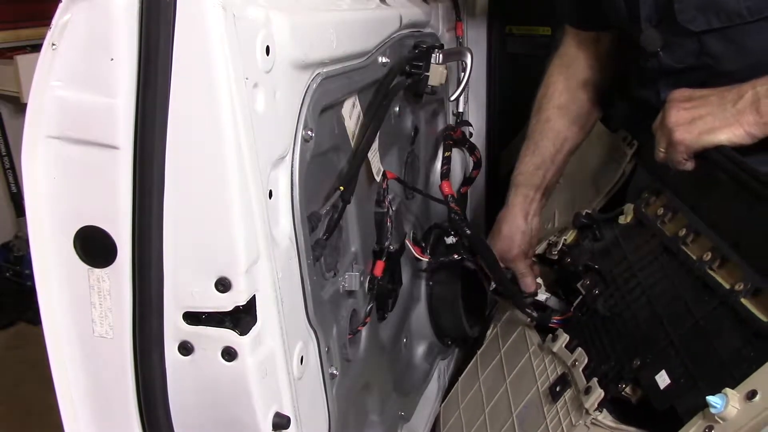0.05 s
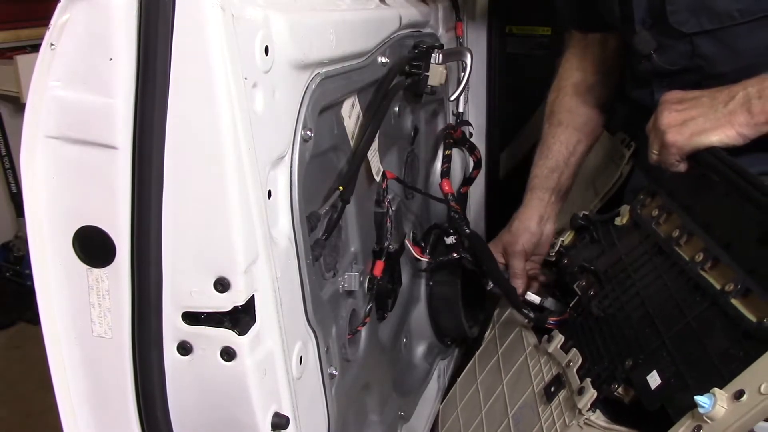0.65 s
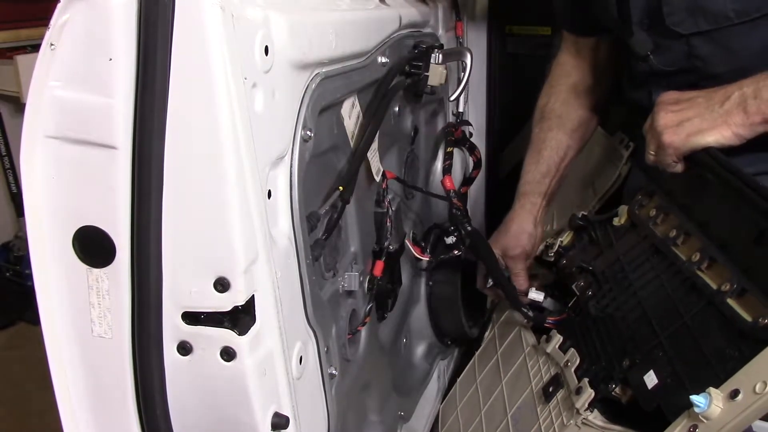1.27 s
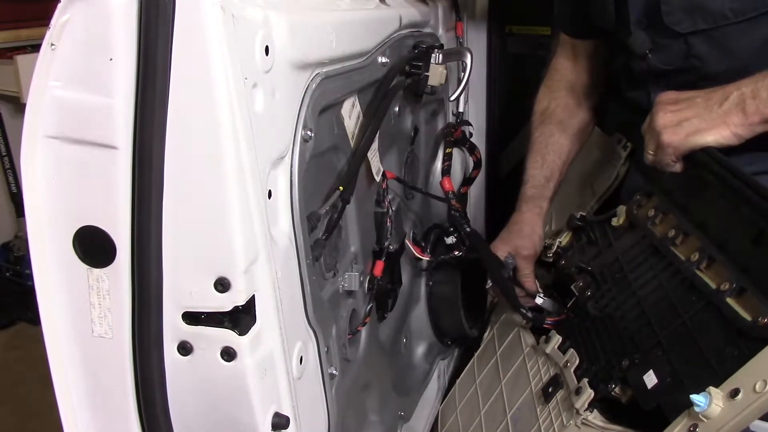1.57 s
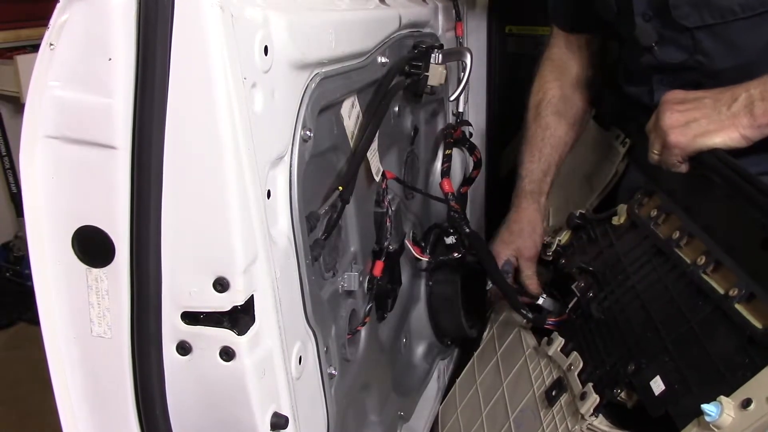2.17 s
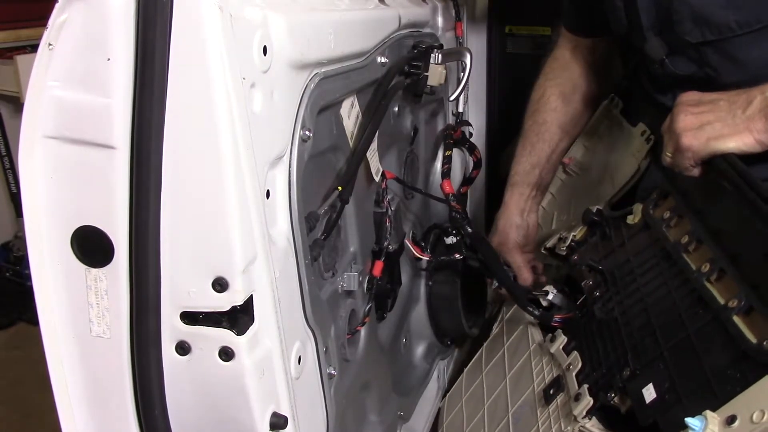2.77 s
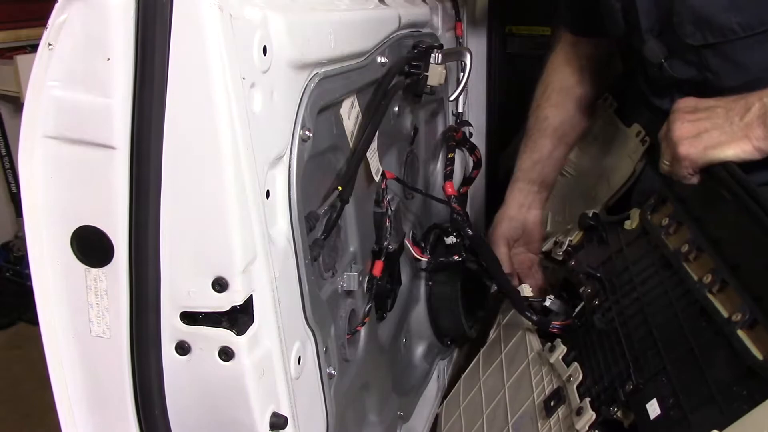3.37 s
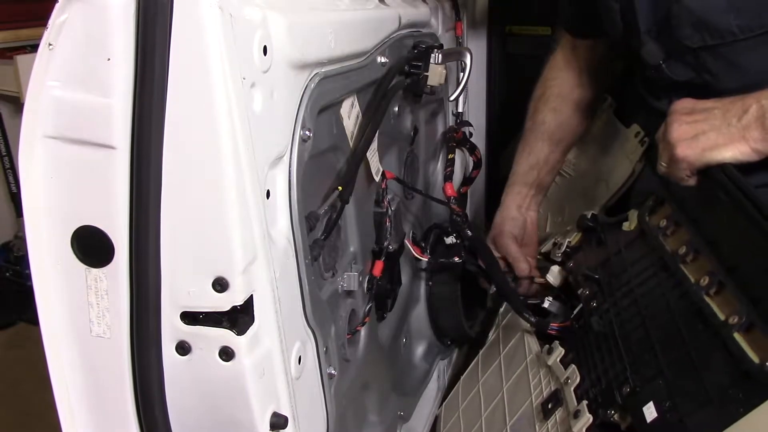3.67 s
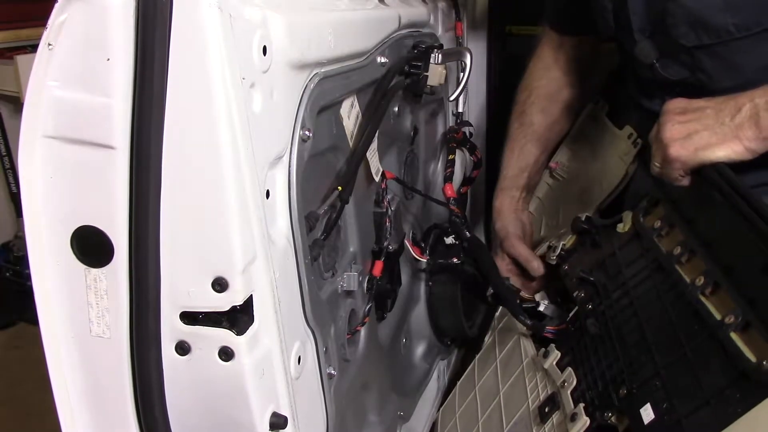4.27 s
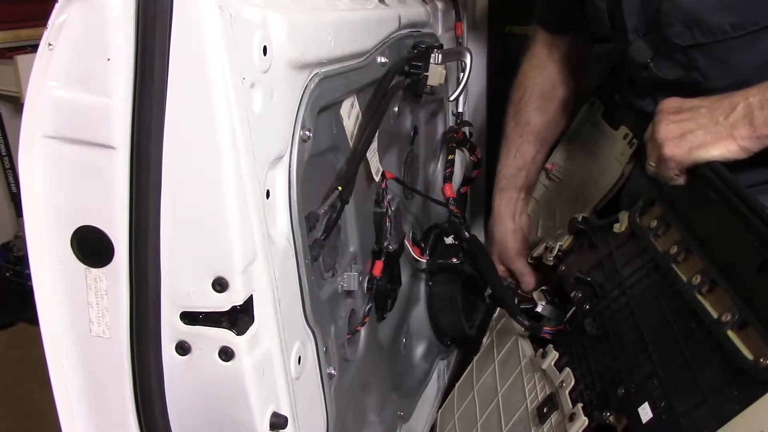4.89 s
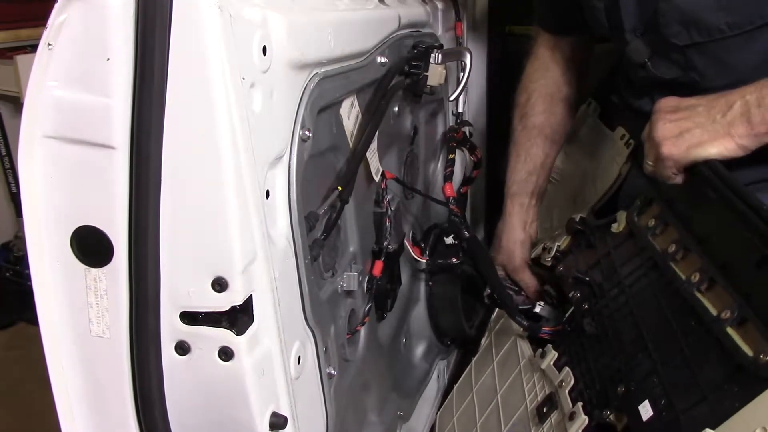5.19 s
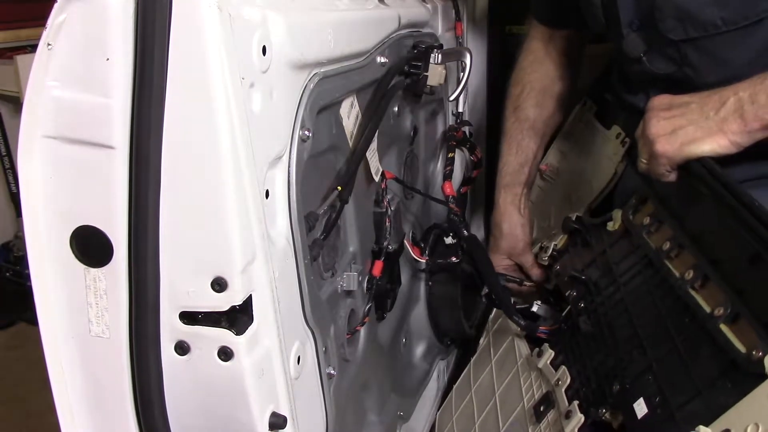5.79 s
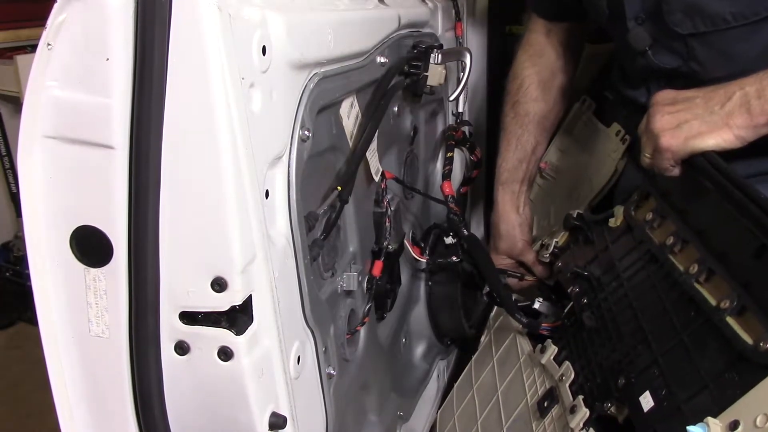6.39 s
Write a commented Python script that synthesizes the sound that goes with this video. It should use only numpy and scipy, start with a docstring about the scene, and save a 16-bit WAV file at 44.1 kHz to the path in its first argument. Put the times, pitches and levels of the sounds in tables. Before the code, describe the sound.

Hands fit plastic plugs into a loose car door panel, making light hollow knocks, small clicks and low thumps in a quiet workshop.

```python
"""In a quiet workshop, hands plug plastic wiring connectors into the back of a loose car door panel.
Plugs and cables brush and knock on the hollow panel, which rings briefly. Each bout of handling
brings dull thumps and a low rumble. One latch snaps home, plastic scuffs and a small catch flicks.
The room adds a short echo, and a close mono microphone adds hiss and a thin electronic whine."""
import sys
import numpy as np
from scipy import signal
from scipy.fft import rfft, irfft, next_fast_len
from scipy.io import wavfile
from scipy.ndimage import uniform_filter1d

SR = 44100
rng = np.random.default_rng(int(sys.argv[2]) if len(sys.argv) > 2 else 0)


def generate_wav(sig):
    """Save sig (samples, or channels by samples) to the path in sys.argv[1] as 16-bit PCM at SR."""
    pcm = np.round(np.clip(np.atleast_2d(sig).T, -1, 1) * 32767).astype(np.int16)
    wavfile.write(sys.argv[1], SR, pcm)


N = 292775
TIME = np.arange(N) / SR


def from_db(db):
    """Turn decibels into a number to multiply a sound by."""
    return 10 ** (np.asarray(db) / 20)


def rms_one(x):
    """Scale a sound so that its average level (rms) is 1."""
    return x / np.sqrt(np.mean(x ** 2) + 1e-20)


def add(track, start_s, sound):
    """Mix a sound into a track at a given time."""
    start = int(round(start_s * SR))
    track[start:start + len(sound)] += sound[:N - start]


def band_noise(low_hz, high_hz, size):
    """Noise between a low and a high pitch, at average level 1."""
    band = signal.butter(2, [low_hz, min(high_hz, SR * .45)], "band", fs=SR, output="sos")
    return rms_one(signal.sosfilt(band, rng.standard_normal(2 * size))[size:])


def coloured_noise(spectrum):
    """Noise whose balance of lows and highs follows a table, at average level 1."""
    hz, db = np.transpose(spectrum)
    size = next_fast_len(N, real=True)
    bins_hz = np.maximum(np.arange(size // 2 + 1) * SR / size, 1)
    gain = from_db(np.interp(np.log(bins_hz), np.log(hz), db))
    return rms_one(irfft(rfft(rng.standard_normal(size)) * gain, size)[:N])


def resonance(x, hz, width_hz):
    """Make a sound ring at one pitch; a narrower width rings longer."""
    r = np.exp(-np.pi * width_hz / SR)
    feed = np.array([1, 0, -1]) * (1 - r * r) / 2
    feedback = [1, -2 * r * np.cos(2 * np.pi * hz / SR), r * r]
    return signal.lfilter(feed, feedback, x + 1e-18)


def dying(t, fade_s):
    """A fade that falls by 60 dB in fade_s seconds."""
    return np.exp(-np.log(1000) * t / fade_s)


def burst(low_hz, high_hz, rise_s, fade_s):
    """A blow starts many crowded tones at once, heard as a short burst of noise."""
    t = np.arange(SR // 8) / SR
    hz = np.arange(1, 4098) * SR / 8192
    off_centre = (hz ** 2 - low_hz * high_hz) / (hz * (high_hz - low_hz))
    white = rng.standard_normal(2 * len(hz) - 2)
    noise = irfft(rfft(white) / np.hypot(1, off_centre ** 2))[:len(t)]  # weak outside the band
    shape = (1 - np.exp(-(t / rise_s) ** 2)) * dying(t, fade_s)
    shape /= shape.max()
    hit = noise * shape
    return hit * np.linalg.norm(shape) / np.linalg.norm(hit)  # the shape alone sets the energy


def background(hiss_db=-46):
    """Steady room noise and microphone hiss, with a few thin electronic tones."""
    # tone colour of the room noise and hiss: pitch_hz, relative_db
    hiss_colour = [(8.8, -31), (15, 1), (70, -2), (112, -7.5), (275, -10), (300, -12.5), (390, -12.5),
                   (740, -15), (856, -16), (1320, -17.5), (1720, -18), (2110, -19), (2300, -19),
                   (12400, -21.5), (15700, -25.5)]
    # tones of the electronic whine: pitch_hz, level_db (rms)
    tones = [(6008, -74), (6222, -75), (7111, -75), (8000, -74), (12023, -64.5), (14223, -76)]
    whine = sum(from_db(db) * np.sqrt(2) * np.sin(2 * np.pi * (hz * TIME + rng.random()))
                for hz, db in tones)
    return from_db(hiss_db) * coloured_noise(hiss_colour) + whine


def panel(push):
    """The hollow panel takes up part of a push's energy and rings on."""
    # pitches at which the panel rings: pitch_hz, width_hz, relative_db
    rings = [(191, 40, 7.5), (277, 24, -12), (416, 93, 0.5), (542, 53, 2), (678, 45, 4), (806, 27, -3),
             (958, 55, 2.5), (1348, 35, 2.5), (1720, 69, -2.5), (2160, 92, -16)]
    sound = push + sum(from_db(db) * resonance(push, hz, width_hz) for hz, width_hz, db in rings)
    return sound * np.linalg.norm(push) / np.linalg.norm(sound)


def brushing(swell_db_per_s=120, fade_db_per_s=200):
    """Hands and cables rub over the panel in soft strokes that swell and fade."""
    # strokes over the panel: peak_s, level_db
    strokes = [(0.06, -51), (1.45, -45.5), (1.93, -49), (3.3, -49.5), (3.69, -48.5), (4.15, -52)]
    rub = panel(band_noise(low_hz=177, high_hz=890, size=N))
    gain = np.zeros(N)
    for peak_s, db in strokes:
        drop_db = np.maximum(swell_db_per_s * (peak_s - TIME), fade_db_per_s * (TIME - peak_s))
        gain += from_db(db - drop_db)
    return rub * gain


def knocks(thud_hz=246, clack_hz=2095, tick_hz=5570, tick_db_per_octave=50, grit_db=-3.5):
    """Plugs and cables land: the panel knocks, thuds and clacks, and the plug itself ticks."""
    # hits on the panel: start_s, level_db, pitch_hz, thud_db, clack_db, tick_db
    # (the last three are added to level_db)
    hits = [(0.1, -38.5, 690, -8, -12, -11), (0.352, -38, 620, 4, -10, -13),
            (0.502, -40.5, 610, -1, 0.5, -2), (0.54, -41, 610, 2, -8, -6),
            (0.937, -37.5, 680, -2, -12, -21), (0.95, -35.5, 640, 3, -13, -13),
            (1.34, -23, 714, 2, -8, -13.5), (1.417, -36.5, 710, 5.5, -5, -11),
            (1.9245, -37, 780, 6, -12, -12), (1.9326, -30, 790, 5, -5.5, -23),
            (1.965, -40.5, 630, 10, -12, -20), (2.522, -35.5, 820, -4, -15, -21),
            (2.739, -34.5, 820, -2, -7.5, -13), (2.809, -34, 825, -10, -5.5, -10),
            (3.0735, -25.5, 740, -7.5, -12, -16), (3.206, -30, 910, -1.5, -16, -10.5),
            (3.283, -36, 765, -0.5, -10, -14), (3.299, -38.5, 790, 2, -4, -17),
            (3.4464, -27, 810, -5, -12, -17), (3.567, -31, 780, -12, -19, -19),
            (3.588, -37.5, 880, -3, -15, -17), (3.609, -35, 720, -7, -19, -21),
            (3.6324, -34.5, 930, 3, 10, 1), (3.6543, -41, 730, 4.5, 6.5, 3), (3.7, -41, 674, 4, -3, -3),
            (3.8533, -31, 780, -4, -4, -27), (3.868, -34, 1010, -8, -4.5, -24),
            (3.929, -29, 720, -11, 0, -16), (3.944, -26.5, 834, -8, -6.5, -10),
            (3.961, -31, 740, 4.5, -9, -8.5), (4.085, -44, 950, -5, -5, -9),
            (4.144, -34.5, 930, -3.5, -10, -18), (4.2203, -36.5, 690, -1, -9, -13),
            (4.243, -38.5, 900, -6, -22, -20), (5.3086, -26, 720, -16, -8.5, -27),
            (5.513, -35.5, 830, -4, -5, -18), (5.655, -32.5, 1010, -7, 1.5, -8.5),
            (5.687, -29.5, 770, -19, -1.5, -18), (5.975, -40.5, 666, -7, -7.5, -17)]
    # knock, thud, clack and tick: spread (pitch ratio either side), relative_db, rise_s, fade_s
    parts = [(1.29, -1.5, 0.0015, 0.044), (1.505, -4, 0.0022, 0.058), (1.395, -2, 0.001, 0.043),
             (1.21, -3, 0.0003, 0.039)]
    out = np.zeros(N)
    for start_s, db, knock_hz, thud_db, clack_db, tick_db in hits:
        # a harder contact ticks louder and clacks higher
        pitches_hz = [knock_hz, thud_hz, clack_hz * 2 ** (tick_db / tick_db_per_octave), tick_hz]
        levels_db = db + np.array([0, thud_db, clack_db, tick_db])
        knock, thud, clack, tick = [
            from_db(level_db + part_db) * burst(hz / spread, hz * spread, rise_s, fade_s)
            for hz, level_db, (spread, part_db, rise_s, fade_s) in zip(pitches_hz, levels_db, parts)]
        grit = from_db(db + tick_db + grit_db) * burst(2800, 11000, rise_s=0.00041, fade_s=0.042)
        add(out, start_s, panel(knock) + panel(thud) + panel(clack) + tick + grit)
    return out


def rumble(boost_db=0.5, rise_s=0.049, sag_db_per_s=38.5, release_db_per_s=150):
    """A low rumble starts as a hand takes hold, eases as it works and dies when it lets go."""
    # bouts of handling: start_s, length_s, level_db
    bouts = [(0.32, 0.44, -20), (2.643, 0.19, -18.5), (5.006, 0.56, -17.5), (5.65, 0.32, -30.5)]
    # tone colour of the rumble: pitch_hz, relative_db
    rumble_colour = [(12, -7), (22, 6.5), (38, 4.5), (62, -2), (90, -11.5), (125, -17.5), (180, -27.5),
                     (300, -58)]
    handling = np.zeros(N)
    for start_s, length_s, db in bouts:
        age_s = np.maximum(TIME - start_s, 0)
        loss_db = sag_db_per_s * age_s + release_db_per_s * np.maximum(age_s - length_s, 0)
        handling += np.minimum(age_s / rise_s, 1) ** 2 * from_db(db + boost_db - loss_db)
    noise = coloured_noise(rumble_colour)
    # even out the noise, so that it swells only with the handling
    power = uniform_filter1d(uniform_filter1d(noise ** 2, size=1800), size=1800)
    return handling * noise / np.sqrt(power)


def thumps(swell_cycles=0.88, sharpness=2.7):
    """Soft pushes make dull thumps that swell and die within a few slow swings."""
    # soft pushes: start_s, level_db, pitch_hz
    pushes = [(0.347, -19.5, 97), (0.38, -16.5, 61), (0.425, -14, 42), (0.46, -15, 34), (0.58, -23, 53),
              (0.745, -29, 45), (0.855, -32, 30.6), (1.763, -33.5, 87), (1.972, -34, 88), (2.695, -11, 53),
              (2.787, -13, 43.7), (5.043, -6.5, 58.3), (5.11, -16, 63), (5.231, -10, 42),
              (5.273, -16.5, 85), (5.49, -23.5, 38), (5.68, -24, 41.7), (5.755, -24.5, 65),
              (5.799, -22, 42), (5.86, -26.5, 41.7), (6.439, -32.5, 60)]
    out, t = np.zeros(N), np.arange(SR // 3) / SR
    for start_s, db, hz in pushes:
        age = t * hz / swell_cycles  # 1 at the top of the swell
        swell = (age * np.exp(1 - age)) ** sharpness
        add(out, start_s, from_db(db) * swell * np.sin(2 * np.pi * hz * t))
    return out


def latch(shell_db=-0.5, crack_db=-25.5, sizzle_db=-21.5, chatter_db=-21):
    """The latch snaps home: the connector's shell rings, and the catch cracks and chatters."""
    # the strike and its rebound: start_s, level_db
    strikes = [(1.9324, 1), (1.9356, -18)]
    # ringing tones of the plastic shell: pitch_hz, relative_db, rise_s, fade_s
    shell_tones = [(2620, -29.5, 0.0011, 0.03), (3960, -25, 0.0013, 0.024), (4904, -10, .0018, 0.016),
                   (5300, -15, 0.002, 0.02), (5660, -20, .0022, .02), (6570, -17, 0.0012, 0.01),
                   (7440, -10, 0.0011, 0.014), (7765, -10, .0014, 0.023), (7970, -4.5, 0.0011, 0.016),
                   (8220, -10, .001, .011), (10170, -19, 0.0006, 0.016), (11900, -15, .0007, 0.015)]
    out, t = np.zeros(N), np.arange(SR // 8) / SR
    ring = np.zeros(len(t))
    for k, (hz, db, rise_s, fade_s) in enumerate(shell_tones):
        shape = (1 - np.exp(-(t / rise_s) ** 2)) * dying(t, fade_s)
        ring += (-1) ** k * from_db(db + shell_db) * shape * np.sin(2 * np.pi * hz * t)
    for start_s, db in strikes:
        crack = from_db(crack_db) * burst(2020, 8900, rise_s=0.00026, fade_s=0.027)
        sizzle = from_db(sizzle_db) * burst(9800, 12900, rise_s=0.00026, fade_s=0.027)
        chatter = from_db(chatter_db) * burst(4710, 5650, rise_s=0.0021, fade_s=0.027)
        add(out, start_s, from_db(db) * (ring + crack + sizzle + chatter))
    return out


def scuff(start_s=2.159, length_s=0.054, edge_s=0.004, level_db=-44.5, slips_per_s=1500):
    """Plastic slides on plastic in tiny slips that make the shell ring high and bright."""
    slips = (rng.random(N) < slips_per_s / SR) * rng.standard_normal(N)
    sliding = np.clip(np.minimum(TIME - start_s, start_s + length_s - TIME) / edge_s, 0, 1)
    return from_db(level_db) * sliding * rms_one(resonance(slips, hz=8200, width_hz=1900))


def flick(start_s=3.0735, level_db=-30.5):
    """As a plug lands, a small catch springs back with one crisp, high tick."""
    out = np.zeros(N)
    add(out, start_s, from_db(level_db) * burst(8200, 11300, rise_s=0.00027, fade_s=0.03))
    return out


def workshop_echo(sound, gap_s=0.005, build_s=0.013):
    """Reflections from the room build up after a short gap; each band fades at its own rate."""
    # bands of the echo: low_hz, high_hz, level_db, fade_s
    bands = [(148, 640, -7.5, 0.29), (560, 1500, -11.5, 0.13), (1520, 4300, -14, 0.34),
             (5220, 5900, -7.5, .26), (7240, 7800, -13, 0.23), (8450, 11700, -16, 0.18)]
    t = np.arange(SR // 2) / SR
    build_up = np.clip((t - gap_s) / build_s, 0, 1)
    echo = np.zeros(len(t))
    for low_hz, high_hz, db, fade_s in bands:
        tail = band_noise(low_hz, high_hz, len(t)) * build_up * dying(t, fade_s)
        band_share = 2 * (high_hz - low_hz) / SR  # a wider band holds more energy
        echo += from_db(db) * np.sqrt(band_share) * tail / np.linalg.norm(tail)
    return signal.fftconvolve(sound, echo)[:N]


def scene():
    """Mix the sounds; only the plastic ones echo. One microphone feeds both channels."""
    plastic = brushing() + knocks() + latch() + scuff() + flick()
    mono = background() + plastic + rumble() + thumps() + workshop_echo(plastic)
    return np.array([mono, mono])


def record(dry, cutoff_hz=15800):
    """A steep filter cuts away the very highest treble."""
    return signal.sosfilt(signal.ellip(12, .1, 80, cutoff_hz, fs=SR, output="sos"), dry)


dry = scene()
out = record(dry)
generate_wav(out)
```